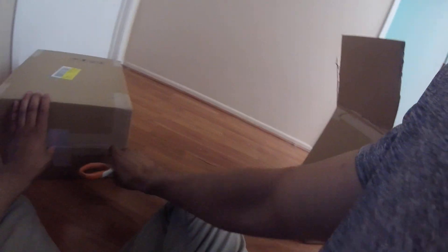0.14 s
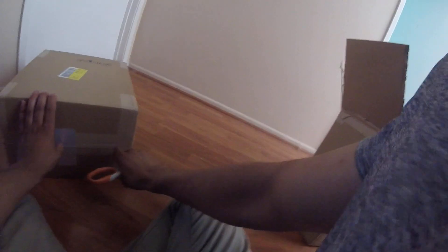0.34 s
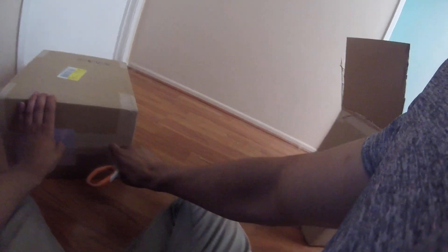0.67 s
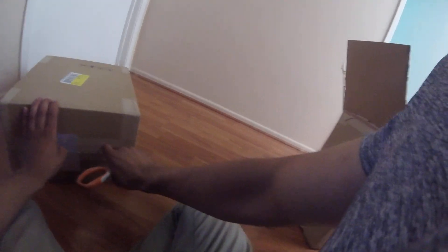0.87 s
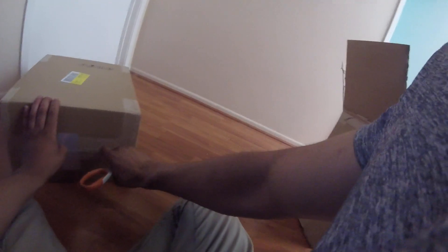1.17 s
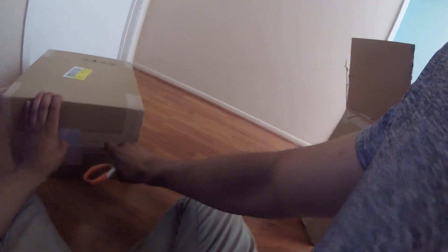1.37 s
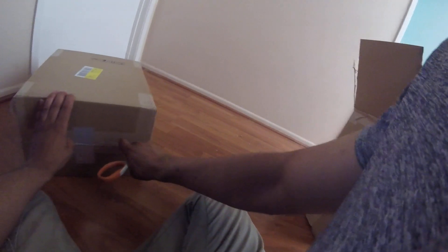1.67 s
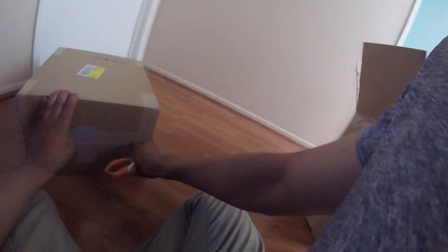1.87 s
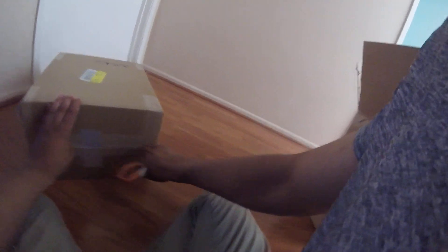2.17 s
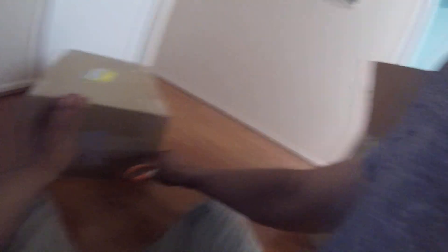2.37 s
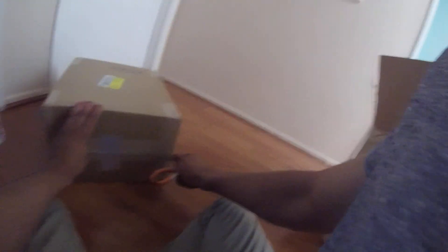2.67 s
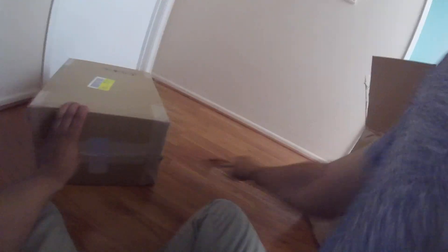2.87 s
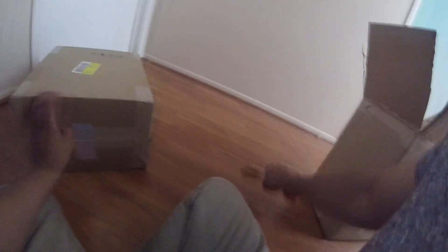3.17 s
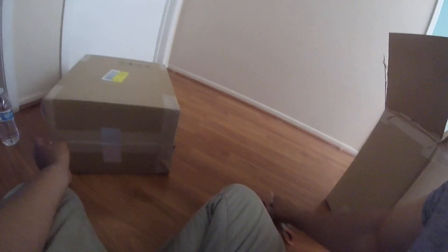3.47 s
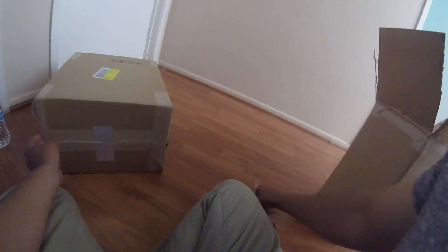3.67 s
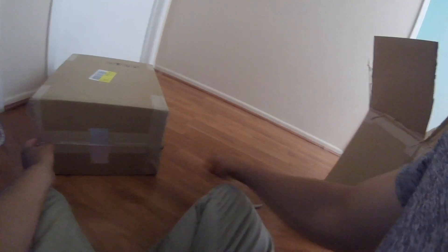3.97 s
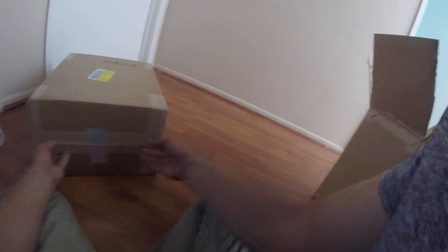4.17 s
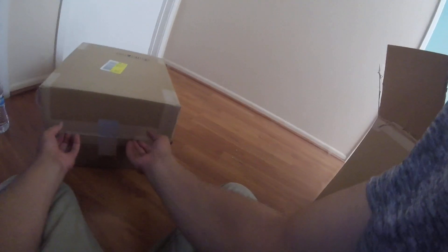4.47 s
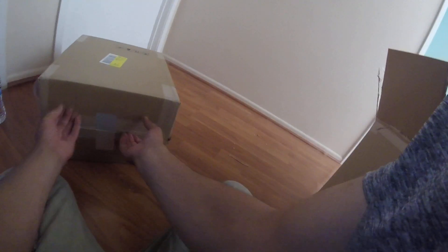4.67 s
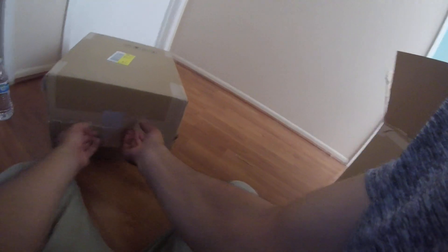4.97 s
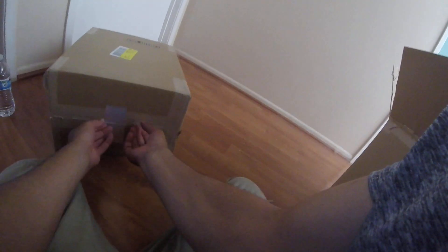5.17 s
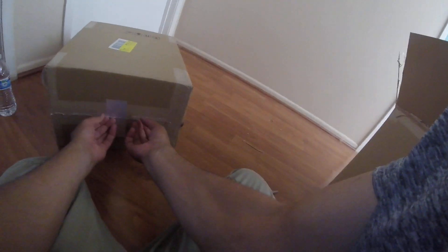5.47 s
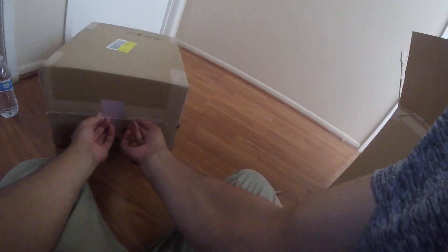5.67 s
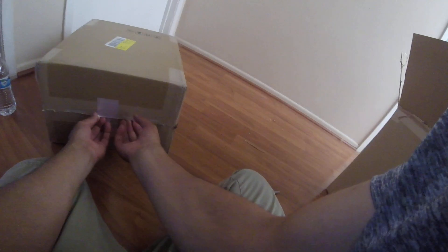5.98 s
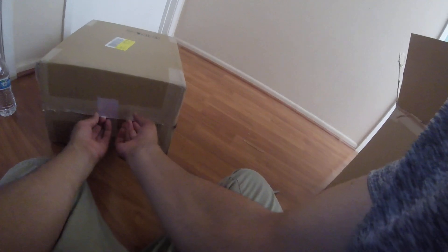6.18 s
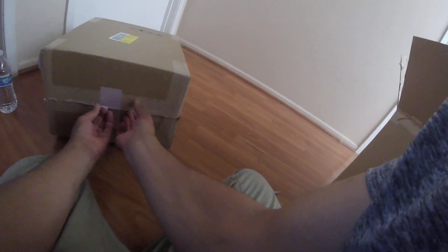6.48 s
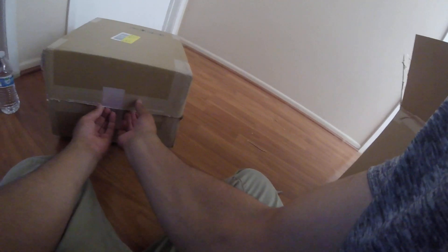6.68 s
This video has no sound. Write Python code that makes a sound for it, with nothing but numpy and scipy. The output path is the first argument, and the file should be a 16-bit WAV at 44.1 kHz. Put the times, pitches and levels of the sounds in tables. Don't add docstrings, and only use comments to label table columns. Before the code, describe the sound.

Dull, boxy knocks and short scrapes come first, with one strong poke, followed by a rapid run of tape snaps and jerks. After a quieter slide, scissors bounce briefly on floorboards. Soft fingertip bumps and rubbing follow, a near pause, then isolated ticks and tiny twangs as nails catch the tape. Close, slightly sharp sound in a small bare room, with faint low rumble and microphone hiss.

```python
import sys
import numpy as np
from scipy import signal
from scipy.fft import rfft, irfft
from scipy.io import wavfile

SR = 44100
rng = np.random.default_rng(int(sys.argv[2]) if len(sys.argv) > 2 else 0)


def convert_level_to_amplitude(level_db):
    exponent = np.asarray(level_db, float) / 20
    return 10 ** exponent


def persist_wave(psi):
    counts = np.round(np.clip(psi, -1, 1) * 32767).astype(np.int16)
    wavfile.write(sys.argv[1], SR, np.atleast_2d(counts).T)


N = 301630


def rms_one(x):
    return x / np.sqrt(np.mean(x ** 2) + 1e-20)


def at_hz(points, hz):
    table_hz, values = np.array(points).T
    return np.interp(np.log(hz), np.log(table_hz), values)


def butter(x, order, hz, kind):
    return signal.sosfilt(signal.butter(order, hz, kind, fs=SR, output="sos"), x)


def joined(*kinds):
    return [(*row, shared) for rows, shared in kinds for row in rows]


def ring(clicks, hz, t60):
    radius = convert_level_to_amplitude(-60 / (t60 * SR))
    angle = 2 * np.pi * hz / SR
    return signal.lfilter([0, np.sin(angle)], [1, -2 * radius * np.cos(angle), radius ** 2], clicks + 1e-18)


def flicker(rate, depth_db):
    knots = rng.standard_normal(int(N / SR * 200))
    return convert_level_to_amplitude(depth_db * np.interp(np.arange(N) / SR * rate, np.arange(len(knots)), knots))


def coloured(spectrum, level_db):
    hz = np.maximum(np.fft.rfftfreq(N, 1 / SR), 1)
    noise = irfft(rfft(rng.standard_normal(N)) * convert_level_to_amplitude(at_hz(spectrum, hz)), N)
    return convert_level_to_amplitude(level_db) * rms_one(noise)


# frequency in Hz, density in dB per Hz.
RUMBLE = [(12, -15), (20, 6), (57, -7.5), (251, -17.5), (586, -19.5), (702, -22), (783, -22), (1500, -31),
          (1950, -108), (3300, -120)]
# frequency in Hz, density in dB per Hz.
HISS = [(880, -30), (1500, 0), (3330, -5.5), (3630, -11), (4800, -7.5), (5230, -10.5), (6650, -1.5),
        (9220, -7.5), (12400, -14), (14200, -12), (15200, -20)]


def background():
    rumble = coloured(RUMBLE, level_db=-53) * flicker(rate=2.5, depth_db=0.14)
    return rumble + coloured(HISS, level_db=-65.5)


# start in seconds, length in seconds, box wall level in dB,
# tape hiss level in dB (both at the end), swell on the way in dB.
BLADE_STROKES = [
    (0.09, 0.1, -56.5, -76, -5),
    (0.272, 0.079, -39, -49.5, 4.5),
    (0.44, 0.059, -43.5, -48, -2.5),
    (0.703, 0.065, -30.5, -40.5, 12),
    (0.755, 0.07, -37, -45, 2),
    (1.4, 0.015, -31.5, -50, 10),
    (1.79, 0.048, -32.5, -51, 11),
    (1.846, 0.0014, -18, -38.5, -7.5),
    (2.018, 0.032, -34.5, -41, -1.5),
]
# start and length in seconds, wall, tape and swell levels in dB.
CUT_STROKES = [(2.178, 0.028, -38.5, -52, 6.5), (2.236, 0.0084, -32.5, -44, -2),
               (2.25, 0.082, -24.5, -35, 15), (2.5, 0.015, -38.5, -49.5, -6.5),
               (2.53, 0.055, -39, -46, -5.5), (2.6, 0.041, -28.5, -34, 1.5), (2.757, 0.079, -28.5, -30, 12),
               (2.851, 0.025, -19.5, -25, 10.5), (2.89, 0.08, -39.5, -52, -5),
               (3.1, 0.226, -52.5, -58, 4.5), (3.355, 0.0082, -41, -49, -1)]
# start and length in seconds, wall, tape and swell in dB.
HAND_STROKES = [(3.722, 0.049, -47.5, -56.5, 14), (3.887, 0.045, -22.5, -38, 1),
                (3.94, 0.099, -40.5, -55, -17.5), (4.229, 0.05, -38, -50.5, -4.5),
                (4.27, 0.046, -32, -45, 12), (4.375, 0.061, -40.5, -52, 5.5), (4.48, 0.029, -38, -50, 7),
                (4.52, 0.05, -44.5, -58.5, -12), (4.635, 0.067, -35, -50.5, 9.5),
                (4.715, 0.093, -50.5, -57, -8.5), (4.785, 0.23, -55.5, -64.5, -14),
                (4.905, 0.33, -51.5, -63, 6.5)]
# start and length in seconds, wall, tape and swell levels in dB.
NAIL_STROKES = [
    (5.95, 0.03, -52.5, -61, -8),
    (6.0, 0.17, -51.5, -67, -3.5),
    (6.29, 0.078, -43.5, -56, 4),
    (6.393, 0.0019, -43, -35.5, -11),
    (6.4, 0.03, -57, -60, -12),
    (6.652, 0.11, -50.5, -71, -4),
    (6.762, 0.07, -72, -57, -23.5),
]
BLADE_TILT, CUT_TILT, HAND_TILT, NAIL_TILT = (0.13, 0.19), (1.9, -0.77), (-0.8, -3.5), (1.6, -2.2)


def stroke_curves(surface):
    grip_s, release_db_per_s, silent_db = 0.02, 597, -90
    t = np.arange(N) / SR
    level, tilts = np.full(N, float(silent_db)), np.zeros(N)
    strokes = joined((BLADE_STROKES, BLADE_TILT), (CUT_STROKES, CUT_TILT),
                     (HAND_STROKES, HAND_TILT), (NAIL_STROKES, NAIL_TILT))
    for start, length, wall_db, tape_db, swell_db, (wall_tilt, tape_tilt) in strokes:
        db, tilt = (wall_db, wall_tilt) if surface == "wall" else (tape_db, tape_tilt)
        end = start + length
        times = [start - grip_s, start, end, end + (db - silent_db) / release_db_per_s]
        shape = np.interp(t, times, [silent_db, db - swell_db, db, silent_db])
        tilts[shape > level] = tilt
        level = np.maximum(level, shape)
    return level, tilts


def rubbed(modes, surface, per_s, lumps_per_s):
    level_db, tilt = stroke_curves(surface)
    slips = rng.random(N) < per_s / SR
    sizes = convert_level_to_amplitude(2.5 * np.minimum(rng.exponential(1, N), 4)) * slips
    sizes = sizes * flicker(lumps_per_s, depth_db=2.5)
    middle_hz = modes[len(modes) // 2][0]
    total = np.zeros(N)
    for hz, db, t60 in modes:
        gain = convert_level_to_amplitude(db + tilt * np.log2(hz / middle_hz))
        total += gain * ring(sizes * rng.standard_normal(N), hz, t60)
    return convert_level_to_amplitude(level_db) * rms_one(total)


# frequency in Hz, level in dB, decay t60 in seconds.
BOX = [(71.5, -5, 0.045), (178, -6, 0.13), (208, -2, 0.15), (270, -3, 0.039), (330, 1.5, 0.058),
       (417, 4, 0.047), (520, -10.5, 0.04), (636.6, -1.5, 0.055), (753, -13, 0.026), (859, -2.5, 0.018),
       (994, 2.5, 0.011), (1252, -14, 0.03), (1590, -21.5, 0.074)]


def rubbed_wall():
    return butter(rubbed(BOX, "wall", per_s=1100, lumps_per_s=45), 2, 2100, "low")


# frequency in Hz, level in dB, decay t60 in seconds.
TAPE = [(1600, -30, 0.0019), (2170, -1, 0.0036), (2555, 0, 0.0036), (3060, -9, 0.008), (3600, -3, 0.0053),
        (4650, -9.5, 0.015), (5010, 0, 0.0079), (5600, -6.5, 0.013), (6240, -3, 0.0089), (6740, -9, 0.0073),
        (7640, -6, 0.0047), (8430, -1.5, 0.0019), (8950, -4.5, 0.0045), (10900, -39, 0.0014)]


def rubbed_tape():
    return rubbed(TAPE, "tape", per_s=9000, lumps_per_s=90)


def struck(events, modes=BOX, octaves=0.57, direct=3.1, body_db=-3.0):
    out = np.zeros(N + SR)
    t = np.arange(SR // 5) / SR
    for start, db, hz, ring_s in events:
        blow = -direct * np.sin(2 * np.pi * hz * t) * convert_level_to_amplitude(-60 * t / ring_s * 2.4)
        for mode_hz, mode_db, t60 in modes:
            near = np.exp(-(np.log2(mode_hz / hz) / octaves) ** 2)
            gain = near * rng.standard_normal() * convert_level_to_amplitude(mode_db + body_db)
            decay = convert_level_to_amplitude(-60 * t * (1 / ring_s + 1 / t60) / 2)
            blow = blow + gain * np.sin(2 * np.pi * mode_hz * t) * decay
        blow = blow * (1 - np.exp(-t * hz * 9)) ** 2
        at = round(start * SR)
        out[at:at + len(t)] += convert_level_to_amplitude(db) * blow / np.abs(blow).max()
    return out[:N]


# start in seconds, peak in dB, contact pitch in Hz.
SHOVES = [(0.212, -36, 152), (0.74, -44, 80.5), (1.407, -35, 237), (1.851, -20, 255), (2.024, -33.5, 250),
          (2.765, -37, 191), (4.04, -39, 149), (0.8, -31, 74.6), (1.21, -37, 89), (1.845, -28, 92),
          (2.26, -33, 77), (2.3, -34, 77), (2.34, -30.5, 78), (2.53, -36, 81.5), (2.59, -37, 80),
          (2.86, -52, 80), (3.879, -21.5, 156), (4.54, -44, 80)]


def shoves():
    return struck(joined((SHOVES, 0.1)))


# start in seconds, peak in dB, contact pitch in Hz.
POKE_KNOCKS = [(0.2129, -27, 400), (0.296, -31.5, 420), (0.326, -42, 422), (0.3305, -32.5, 403),
               (0.3415, -30, 306), (0.449, -36, 418), (0.469, -34, 374), (0.462, -34, 298),
               (0.722, -37, 420), (0.7573, -28, 390), (0.7654, -26, 373), (0.788, -24, 287),
               (0.8037, -38, 450), (0.8195, -25, 820), (0.8223, -25.5, 420), (0.827, -25, 297),
               (0.8369, -29, 387), (1.0324, -29, 257), (1.033, -42, 1010), (0.2135, -40, 870),
               (1.2083, -29, 360), (1.4088, -42, 250), (1.8405, -33, 230), (1.8435, -16.5, 640),
               (1.8455, -17, 405), (1.8482, -8, 452), (1.8528, -18, 245), (1.858, -24, 400),
               (2.0221, -23.5, 330), (2.0293, -20.5, 365)]
# start in seconds, peak in dB, pitch in Hz.
CUT_KNOCKS = [(2.2398, -28, 520), (2.2504, -51, 402), (2.2705, -32, 346), (2.2839, -21.5, 540),
              (2.3144, -26, 350), (2.3444, -32, 270), (2.3912, -45, 416), (2.5359, -42, 520),
              (2.5527, -34, 308), (2.6437, -21, 273), (2.6568, -51, 340), (2.8317, -39, 453),
              (2.8665, -25, 415), (2.8725, -13.5, 590), (2.8742, -11.5, 237), (2.9077, -25, 217),
              (2.9957, -43, 330), (2.879, -19, 425), (2.5995, -29.5, 404), (3.063, -50, 320),
              (3.187, -42, 538), (3.261, -50, 299), (3.3612, -24.5, 330), (3.3786, -29, 265)]
# start in seconds, peak in dB, pitch in Hz.
HAND_KNOCKS = [(3.728, -39.5, 270), (3.843, -38.5, 285), (4.223, -34, 394), (4.2375, -42, 407),
               (4.2965, -31, 520), (4.3039, -38, 480), (4.3135, -23, 270), (4.4211, -30, 410),
               (4.4856, -32.5, 366), (4.502, -30.5, 460), (4.5432, -26.5, 289), (4.6389, -29.5, 448),
               (4.6653, -22, 443), (4.6916, -30, 357), (4.6975, -36, 460), (4.7172, -21.5, 246),
               (4.7905, -22.5, 406), (4.801, -32.5, 440), (4.8341, -32.5, 277), (4.8861, -47, 292),
               (6.409, -14, 437), (6.4145, -27.5, 410)]
# start in seconds, peak in dB, contact pitch in Hz.
NAIL_KNOCKS = [(5.4764, -31.5, 696), (5.5394, -38, 695), (5.7381, -29, 820), (5.8451, -39, 410),
               (5.9295, -37, 382), (5.9474, -35.5, 408), (6.0978, -32.5, 750), (6.1794, -31, 443),
               (6.2302, -35, 754), (6.2836, -29, 620), (6.3897, -25, 674), (6.5876, -28.5, 457),
               (6.6608, -28, 425), (6.756, -24, 456), (6.756, -29, 850), (6.7705, -30, 754),
               (6.7789, -31, 800), (6.78, -35.5, 330)]


def knocks():
    return struck(joined((POKE_KNOCKS, 0.031), (CUT_KNOCKS, 0.05), (HAND_KNOCKS, 0.048), (NAIL_KNOCKS, 0.025)))


# start in seconds, peak in dB, brightness in Hz.
POKE_TICKS = [(0.2127, -48, 3960), (0.2904, -60, 5700), (0.757, -39, 3900), (0.766, -39, 3500),
              (0.7715, -36, 3700), (0.776, -45, 2600), (0.786, -41, 5060), (0.822, -43, 4590),
              (0.8288, -39, 5150), (1.032, -43.5, 5450), (1.2216, -47, 5170), (1.4078, -46, 4830),
              (1.7376, -50, 5180), (1.8439, -35, 4670), (1.8478, -28.5, 6500), (1.978, -42, 5840),
              (2.0208, -21.5, 7060), (2.071, -36.5, 5900), (2.177, -40.5, 5830), (2.2097, -41, 4830)]
# start in seconds, peak in dB, brightness in Hz.
CUT_TICKS = [(2.233, -47, 5640), (2.2405, -34, 5950), (2.2437, -34, 6500), (2.2835, -22.5, 6550),
             (2.313, -44, 5800), (2.334, -25, 4800), (2.348, -39, 5340), (2.5033, -38, 3780),
             (2.5349, -31, 5740), (2.5982, -15.5, 5140), (2.6045, -21, 2980), (2.618, -32, 6300),
             (2.6395, -26.5, 5650), (2.6425, -23, 5500), (2.649, -31, 4800), (2.722, -48, 5970),
             (2.771, -35, 4770), (2.7955, -24, 5460), (2.7997, -44, 4700), (2.8148, -24, 4980),
             (2.8322, -37, 4980), (2.8678, -21, 5230), (2.8728, -12, 5700), (2.8776, -14, 3920),
             (3.2402, -45, 4640), (3.3635, -39, 4260)]
# start in seconds, peak in dB, brightness in Hz.
HAND_TICKS = [(3.7675, -50, 3600), (3.882, -29.5, 5030), (3.8866, -38, 5520), (3.905, -31, 6070),
              (3.9096, -24.5, 5800), (3.939, -31, 4250), (3.9445, -18.5, 4150), (3.9498, -17, 3940),
              (4.186, -48, 3500), (4.2232, -39, 3600), (4.2281, -36, 3600), (4.2376, -36.5, 3720),
              (4.297, -38.5, 4200), (4.308, -46, 2600), (4.318, -47, 4970), (4.41, -44, 5870),
              (4.4861, -53, 3950), (4.6393, -43, 3360), (4.6646, -43, 3060), (4.7891, -39, 4240),
              (4.8585, -42.5, 4950)]
# start in seconds, peak in dB, brightness in Hz.
NAIL_TICKS = [(5.476, -23.5, 5700), (5.5403, -42.5, 5200), (5.544, -35.5, 6350), (5.618, -37.5, 3020),
              (5.7374, -26.5, 7100), (5.7454, -27, 6900), (5.936, -43, 6200), (5.9467, -33, 6330),
              (6.0983, -29.5, 3600), (6.1791, -37, 3900), (6.2305, -24.5, 5800), (6.2628, -44, 5640),
              (6.2841, -38.5, 3290), (6.3213, -41, 5000), (6.3427, -37, 6230), (6.3607, -30.5, 5800),
              (6.388, -42, 5500), (6.3905, -20, 4900), (6.3955, -34, 5800), (6.3975, -41, 5500),
              (6.4005, -43, 5500), (6.7556, -20.5, 4760), (6.7675, -28.5, 6200), (6.7715, -35, 5600),
              (6.7794, -36, 5000)]


def ticks():
    snaps, t = np.zeros(N + SR), np.arange(900) / SR
    events = joined((POKE_TICKS, 0.5), (CUT_TICKS, 0.34), (HAND_TICKS, 0.67), (NAIL_TICKS, 0.43))
    for start, db, hz, crackle_ms in events:
        fade = np.sqrt(t) * np.exp(-t / (2.63 * crackle_ms / 1000))
        crackle = ring(rng.standard_normal(len(t)) * fade, hz, 6.5 / hz)
        ringing = sum(convert_level_to_amplitude(mode_db) * ring(crackle, mode_hz, t60) for mode_hz, mode_db, t60 in TAPE)
        snap = rms_one(crackle) + 0.42 * rms_one(ringing)
        at = round(start * SR)
        snaps[at:at + len(t)] += convert_level_to_amplitude(db) * snap / np.abs(snap).max()
    return snaps[:N]


# start in seconds, peak in dB, pitch in Hz.
TWANGS = [(2.5985, -22.5, 4570), (2.5985, -30.5, 6070), (2.8515, -24, 4900), (2.8665, -19, 4770),
          (2.8725, -27, 4200), (2.875, -21, 2520), (4.2235, -35, 3500), (4.2265, -40, 3730),
          (4.238, -40, 3470), (4.241, -43, 6260), (5.4762, -33, 4800), (5.4762, -32, 5230),
          (5.4762, -34, 6700), (5.4762, -39, 2210), (5.5398, -42, 5700), (5.7376, -31, 5800),
          (5.7376, -34, 7260), (5.7376, -30, 8160), (5.7456, -30, 6350), (6.098, -26.5, 4550),
          (6.098, -32, 2290), (6.098, -42, 3440), (6.2305, -43, 6200), (6.2305, -46, 5000),
          (6.2305, -41, 2100), (6.39, -20.5, 3600), (6.39, -33, 4650), (6.3908, -38, 6430),
          (6.3955, -37, 5000), (6.396, -36, 2220), (6.756, -24, 4500), (6.756, -39, 3600),
          (6.756, -29, 1920)]


def twangs():
    return struck(joined((TWANGS, 0.014)), modes=[], direct=1)


# start in seconds, peak in dB, contact pitch in Hz.
LANDINGS = [
    (3.8805, -14.5, 610),
    (3.9035, -22, 446),
    (3.936, -25, 210),
    (3.944, -24.5, 1100),
    (3.9515, -27.5, 1720),
    (3.959, -28, 200),
    (4.006, -34.5, 413),
]


def landings():
    return struck(joined((LANDINGS, 0.052)))


# frequency in Hz, t60 in seconds.
ROOM_T60 = [(100, 0.28), (700, 0.22), (3000, 0.47), (7000, 0.063), (12000, 1)]


def room(x):
    level_db, gap_s = -10.5, 0.0036
    t = np.arange(SR // 2) / SR
    tail = np.zeros(len(t))
    for hz in 63 * 2. ** np.arange(8):
        band = butter(rng.standard_normal(len(t)), 2, [hz / np.sqrt(2), hz * np.sqrt(2)], "band")
        tail += band * convert_level_to_amplitude(-60 * t / at_hz(ROOM_T60, hz))
    tail = tail * np.clip(t / gap_s - 1, 0, 1)
    return convert_level_to_amplitude(level_db) * signal.fftconvolve(x, tail / np.sqrt(np.sum(tail ** 2)))[:N]


def port_resonance(x):
    hz, width_hz, lift_db = 6550, 454, 6.9
    return x + (convert_level_to_amplitude(lift_db) - 1) * signal.lfilter(*signal.iirpeak(hz, hz / width_hz, fs=SR), x)


def microphone(air, snaps):
    housed = butter(air, 3, [43, 9600], "band")
    edges = convert_level_to_amplitude(-28) * butter(snaps, 4, 11500, "high")
    return port_resonance(housed + edges + background())


def scene():
    low = convert_level_to_amplitude(-5.5) * rubbed_wall() + shoves() + knocks() + landings()
    snaps = ticks()
    high = butter(convert_level_to_amplitude(-6.0) * rubbed_tape() + snaps, 4, 1950, "high")
    twang = twangs()
    reflected = room(low + convert_level_to_amplitude(-1) * high + convert_level_to_amplitude(-9) * twang)
    return microphone(low + high + twang + reflected, snaps)[None]


def band_limit(x):
    return signal.sosfilt(signal.butter(12, 15050, fs=SR, output="sos"), x)


def record(dry):
    cut = signal.cheby2(8, 50, 12900 * 1.18, fs=SR, output="sos")
    mix = signal.sosfilt(cut, dry)
    return band_limit(mix)


dry = scene()
out = record(dry)
persist_wave(out)
```